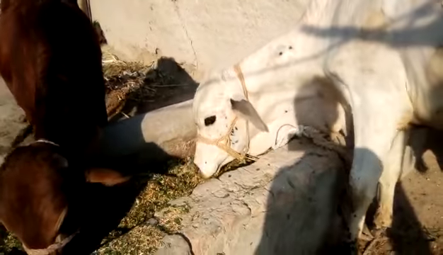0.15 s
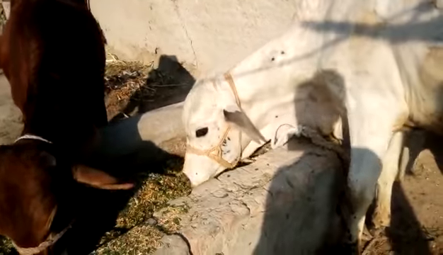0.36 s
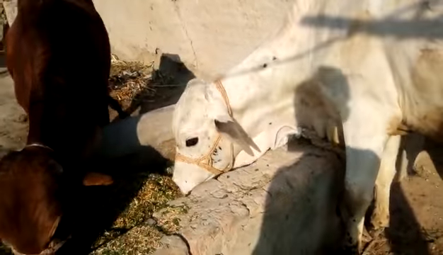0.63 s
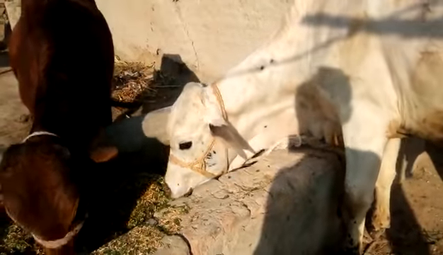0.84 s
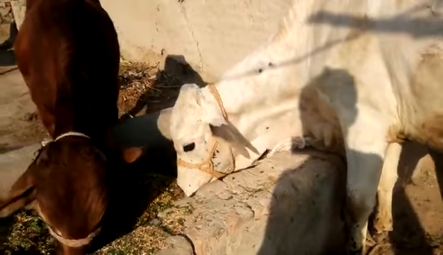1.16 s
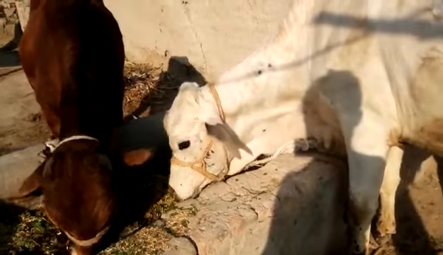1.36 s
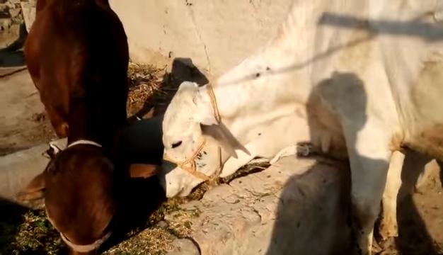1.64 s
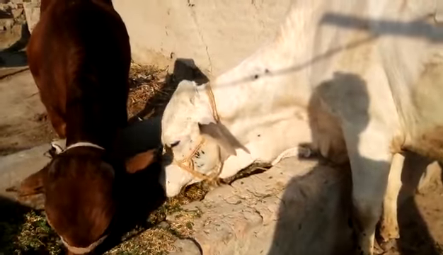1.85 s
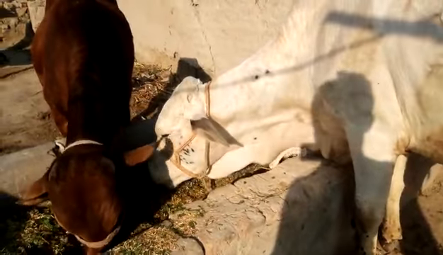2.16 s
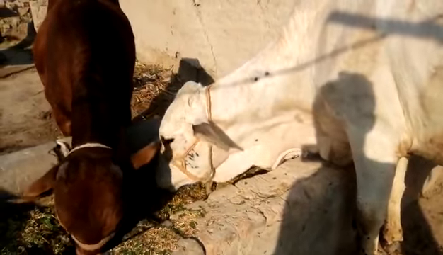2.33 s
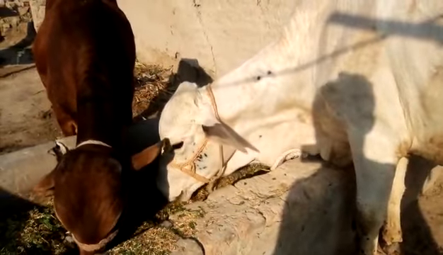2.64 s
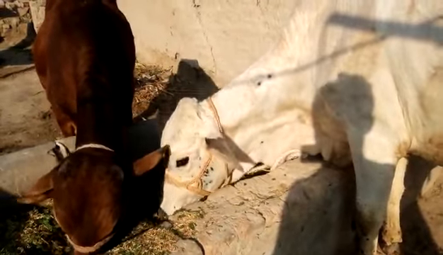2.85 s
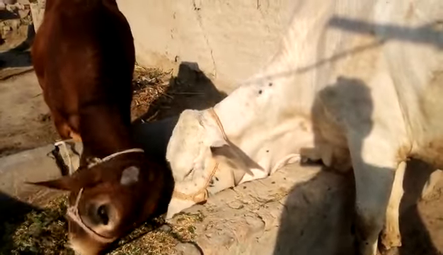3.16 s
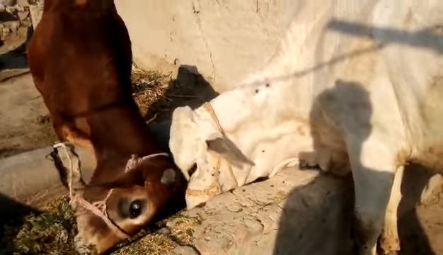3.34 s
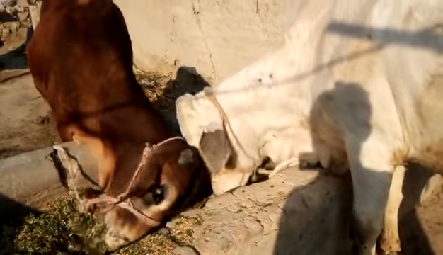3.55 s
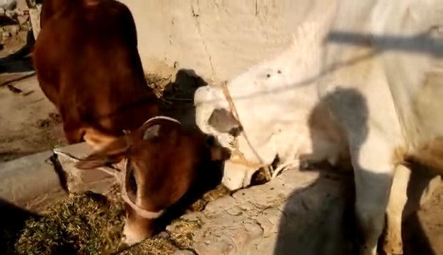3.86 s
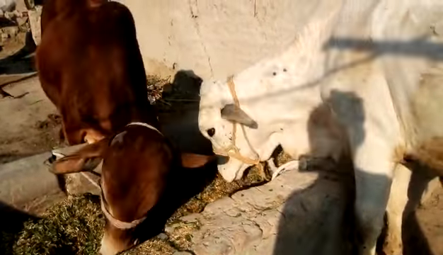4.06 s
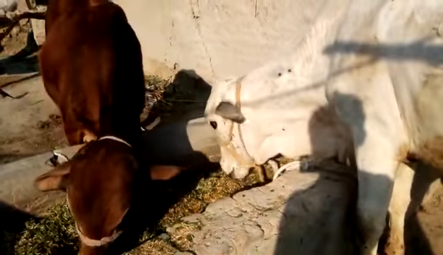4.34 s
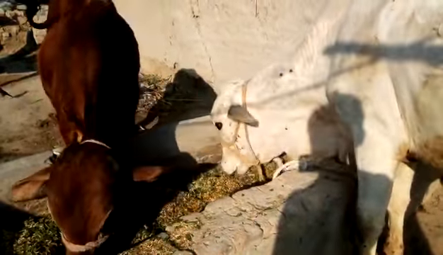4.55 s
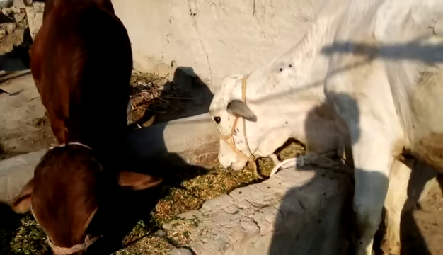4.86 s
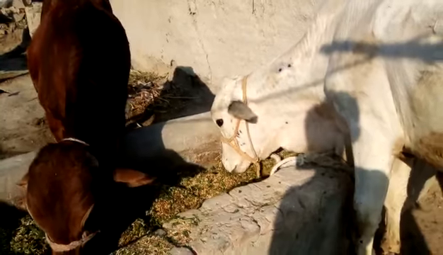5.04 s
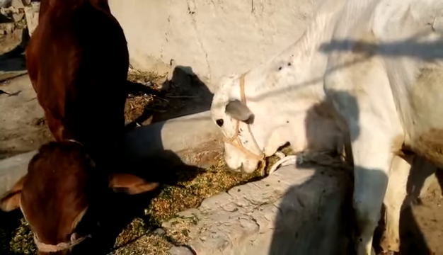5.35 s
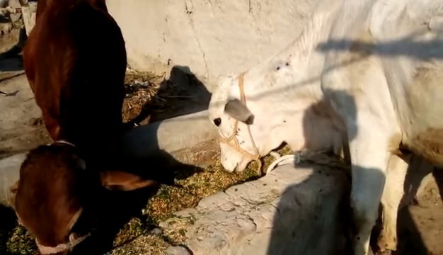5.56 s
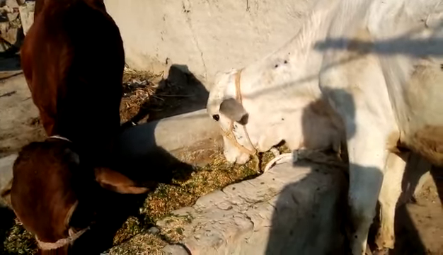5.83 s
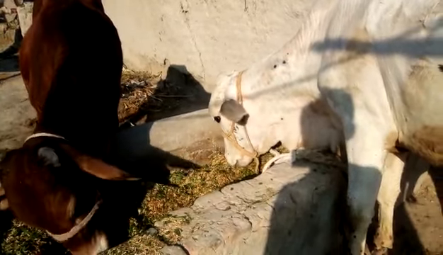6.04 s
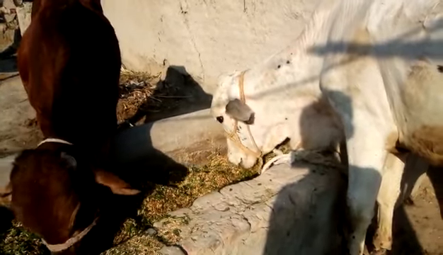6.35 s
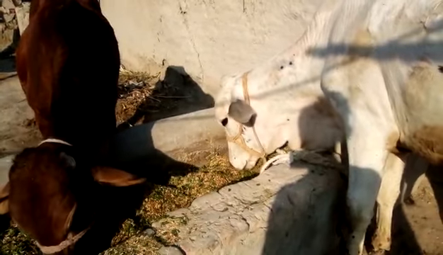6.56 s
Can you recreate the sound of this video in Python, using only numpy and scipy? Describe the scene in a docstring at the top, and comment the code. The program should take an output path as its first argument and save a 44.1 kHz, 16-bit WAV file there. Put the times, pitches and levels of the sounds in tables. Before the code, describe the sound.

Dry fodder crackles and rustles as cattle chew and nose through it in an outdoor yard. Early on come a cluster of snapping stalks and some low thumps, with a faint wavering buzz, perhaps flies, and scattered distant birdsong. The chewing softens, then a nearby bird chirps sharply three times, ringing off the walls. Slight wind bumps the microphone over quiet open air.

```python
"""Cattle chew chopped fodder at a mud trough in a walled yard: chaff rustles and crackles, stalks snap,
muzzles and feet knock. A near bird whistles three rising notes and the walls throw them back; other birds
twitter further off. A low hum, perhaps flies, wavers as narrow bands of noise, and light wind bumps the
microphone over steady far air."""
import sys
import numpy as np
from scipy import signal
from scipy.fft import rfft, irfft
from scipy.io import wavfile
from scipy.ndimage import uniform_filter1d

SR = 44100
rng = np.random.default_rng(int(sys.argv[2]) if len(sys.argv) > 2 else 0)


def store_pcm(level_fs):
    """Save levels as 16-bit WAV."""
    pcm = np.round(np.clip(level_fs, -1, 1) * 32767).astype(np.int16)
    wavfile.write(sys.argv[1], SR, np.atleast_2d(pcm).T)


N = 295470
T = np.arange(N) / SR

# dry chaff spectrum: (frequency [Hz], relative density [dB])
CHAFF_SPECTRUM = [(880, -39), (1500, -22), (1550, -18), (2390, -10.5), (2570, 0), (3410, 0), (4250, 5),
                  (4660, 4.5), (4970, 4.5), (5770, -2.5), (6710, -21), (8720, -34.5), (14800, -120)]


def chewing():
    """Rustle and crackle share the colour of chaff; coarse stalks add a lower body."""
    # bites and pulls: (start [s], length [s], start level [dB], end level [dB], relative stalks [dB])
    bites = [(0, 0.19, -54, -49, -7), (0.298, 0.14, -60, -53.5, -7), (0.75, 0.28, -44.5, -44.5, -12),
             (1.15, 0.075, -57.5, -49, -9), (1.41, 0.1, -52.5, -53, -5), (1.738, 0.083, -57.5, -49, -8),
             (1.891, 0.21, -47.5, -49.5, -8), (2.222, 0.052, -61, -50, -11), (2.445, 0.19, -51, -50, -8),
             (2.69, 0.09, -44, -42, -11.5), (2.934, 0.092, -50.5, -49.5, -9.5),
             (3.162, 0.11, -59.5, -56.5, -8.5), (3.492, 0.095, -67, -58, -34), (3.712, 0.03, -50, -51, -21),
             (3.953, 0.15, -71, -55, -9.5), (4.331, 0.091, -51.5, -58, -21)]
    # steady rummaging: (time [s], level [dB], relative stalks [dB])
    rummage = [(0, -53.5, -11), (.7, -54.5, -11), (1.4, -54, -14.5), (1.65, -58, -8.5), (2.9, -58.5, -7.5),
               (3.45, -68, -5.5), (3.9, -66.5, -19.5), (4.3, -60.5, -14), (4.6, -56.5, -11),
               (5.55, -62, -8.5), (5.75, -53, -26), (5.95, -59, -12.5), (6.09, -53, -21.5),
               (6.7, -70.5, -9.5)]
    # coarse stalks: (frequency [Hz], relative density [dB])
    stalk_spectrum = [(400, -34.5), (1080, -19.5), (1400, -6.5), (1800, 0), (2300, 5.5), (3000, -17.5),
                      (4000, -15)]
    bite_gains = bouts(bites, T, rise_s=0.009, fade_db_per_s=141.5)
    bite_stalk_db = np.transpose(bites)[-1, :, None]
    rummage_db, rummage_stalk_db = curves(rummage, T)
    chaff_gain = power_sum([*bite_gains, amp(rummage_db)])
    stalk_gain = power_sum([*bite_gains * amp(bite_stalk_db), amp(rummage_db + rummage_stalk_db)])
    rustle = patchy(coloured(rng.standard_normal(N), CHAFF_SPECTRUM), depth_db=4.5)
    crunch = patchy(coloured(crackle(per_s=1100, spread_db=6, t60_s=0.027), CHAFF_SPECTRUM), depth_db=4)
    stalks = coloured(crackle(per_s=3200, spread_db=2.5, t60_s=0.031), stalk_spectrum)
    stalks = patchy(stalks, depth_db=4.5)
    crunch_share = 0.26
    chaff = np.sqrt(1 - crunch_share) * rustle + np.sqrt(crunch_share) * crunch
    return chaff_gain * chaff + stalk_gain * stalks


def snaps():
    """Single stalks break: dying bursts, part broad, part ringing."""
    # stalk breaks: (time [s], level [dB], pitch [Hz])
    breaks = [(0.317, -37.5, 4400), (0.319, -43.5, 2130), (0.899, -34, 3460), (0.92, -32.5, 3500),
              (0.942, -35, 4550), (0.95, -32, 4540), (0.9682, -29, 4570), (0.977, -32.5, 4660),
              (0.993, -28.5, 4350), (2.218, -41.5, 2880), (3.237, -46, 4900), (3.7068, -47, 5000),
              (4.3309, -37.5, 3200), (4.35, -35.5, 4000), (4.377, -38.5, 2820), (4.3885, -38, 3460),
              (4.3978, -41.5, 2660), (4.4342, -40, 2800), (6.638, -51, 4400)]
    attack_s, t60_s = 0.0006, 0.016
    out, t = np.zeros(N), T[:3000]
    envelope = amp(-60 * t / t60_s) * np.minimum(t / attack_s, 1)
    for start_s, db, hz in breaks:
        burst = rng.standard_normal(len(t))
        body = band(burst, hz, width_hz=810) + 0.2 * coloured(burst, CHAFF_SPECTRUM)
        add(out, start_s, amp(db) * envelope * body)
    return out


def knocks():
    """Muzzles and feet strike dull blows: a soft-edged ring that dies quickly."""
    # blows: (time [s], level [dB], pitch [Hz], t60 [s])
    blows = [(0.983, -21.5, 103, 0.066), (1.024, -25, 157, 0.046), (1.188, -24.5, 106, 0.037),
             (1.364, -43.5, 325, 0.11), (3.211, -48, 1810, 0.024), (4.203, -43, 140, 0.057),
             (4.701, -59.5, 320, 0.12), (4.919, -62, 324, 0.21), (6.397, -51, 1920, 0.044)]
    attack_cycles = 0.93
    out, t = np.zeros(N), T[:8000]
    for start_s, db, hz, t60_s in blows:
        ring = np.sin(2 * np.pi * hz * t) + 0.27 * band(rng.standard_normal(len(t)), hz, 0.39 * hz)
        add(out, start_s, amp(db - 60 * t / t60_s) * np.minimum(t * hz / attack_cycles, 1) * ring)
    return out


def near_bird():
    """Three whistles leap up, climb and drop, each with a brief level dip, framed by hoarse flicks."""
    # whistles: (start [s], length [s], top pitch [Hz], climb time [s], level [dB], dip delay [s],
    # dip depth [dB], cut before dip [dB], lead flick base level [dB], lead flick start [Hz])
    calls = [(4.682, 0.083, 3255, .017, -24.5, .035, 8, 6.5, -43, 3140),
             (4.935, 0.078, 3200, 0.018, -25, 0.019, 17, 5, -43, 2020),
             (5.191, .088, 3200, .024, -24, .047, 8, 3.5, -41, 2170)]
    # whistle overtones: (pitch multiple, relative level [dB])
    overtones = [(2, -20), (3, -19)]
    # breathy sweeps an octave above a whistle's leap, and at its drop: (length [s], level [dB], start [Hz],
    # middle [Hz], end [Hz])
    edge_rasps = [(0.014, -47, 3900, 4700, 5440), (0.014, -46, 5720, 4600, 4400)]
    # trough and wall reflections: (delay [s], gain [dB])
    echoes = [(.004, -3.5), (0.015, -9), (.047, -8), (.058, -11.5)]
    low_hz, climb_hz = 1990, 492
    leap_s, drop_s, dip_width_s = 0.01, 0.01, 0.0042
    swell_db, leap_db, drop_db = 5.5, 27.5, 30
    lead_ahead_s, lead_length_s, lead_middle_hz, lead_end_hz = 0.041, 0.022, 3750, 2400
    out, u = np.zeros(N), np.linspace(0, 1, num=17)
    for start_s, length_s, top_hz, climb_s, db, dip_s, dip_db, cut_db, lead_db, lead_start_hz in calls:
        t = np.linspace(0, length_s, num=90)
        leap, hold = np.minimum(t / leap_s, 1), np.minimum((length_s - t) / drop_s, 1)
        rising_hz = top_hz - climb_hz * np.exp(-np.maximum(t - leap_s, 0) / climb_s)
        hz = low_hz + leap * hold * (rising_hz - low_hz)
        shape_db = -swell_db * (1 - t / length_s) - leap_db * (1 - leap) ** 1.2
        shape_db -= drop_db * (1 - hold) ** 1.4
        shape_db -= dip_db * np.exp(-((t - dip_s) / dip_width_s) ** 2) + cut_db * (t < dip_s)
        contour = np.c_[start_s + t, hz, db + shape_db]
        add(out, *whistle(contour, flutter_db=1.4, hoarse_s=0.0018, overtones=overtones))
        lead_s, lead_hz = start_s - lead_ahead_s, (lead_start_hz, lead_middle_hz, lead_end_hz)
        lead = np.c_[lead_s + lead_length_s * u, glide(lead_hz, u), np.full_like(u, lead_db - 4)]
        add(out, *whistle(lead, flutter_db=3, hoarse_s=0.005))
        add(out, lead_s, rasp(lead_length_s, lead_db - 4.5, *lead_hz))
        add(out, start_s, rasp(*edge_rasps[0]))
        add(out, start_s + length_s - drop_s, rasp(*edge_rasps[1]))
    highpass = signal.butter(4, 1700, "high", fs=SR, output="sos")  # a small throat gives no bass
    return reverb(signal.sosfilt(highpass, out), tail_db=-6.5, t60_s=0.42, echoes=echoes)


def whistle(contour, flutter_db, hoarse_s=0, waver_hz=0, overtones=()):
    """Start time and tone along (time [s], pitch [Hz], level [dB]); fast glides turn hoarse."""
    t = np.arange(contour[0][0], contour[-1][0], 1 / SR)
    hz, db = curves(contour, t)
    slope_hz_per_s = np.minimum(abs(np.gradient(hz)) * SR, 60000)
    hz = hz + (waver_hz + hoarse_s * slope_hz_per_s) * drift(0.0012, len(t))
    phase = 2 * np.pi * np.cumsum(hz) / SR
    tone = np.sin(phase) + sum(amp(level_db) * np.sin(k * phase) for k, level_db in overtones)
    fade = np.minimum(np.minimum(t - t[0], t[-1] - t) / 0.002, 1)
    return t[0], np.sqrt(2) * tone * fade * amp(db + flutter_db * drift(0.007, len(t)))


def rasp(length_s, db, *hz):
    """Breathy noise through a gliding resonance."""
    u = np.arange(0, 1, 1 / (length_s * SR))
    return amp(db) * band(rng.standard_normal(len(u)), glide(hz, u), width_hz=1800) * np.sin(np.pi * u)


def far_birds():
    """Gliding notes and one rolled call, blurred by distance."""
    # far notes: (time [s], length [s], start [Hz], middle [Hz], end [Hz], level [dB])
    notes = [(.315, 0.024, 4750, 4440, 4240, -42.5), (0.317, 0.04, 3650, 3270, 3100, -52),
             (0.36, .05, 4150, 4110, 4050, -48), (0.417, 0.018, 2300, 3000, 4100, -51),
             (0.434, 0.011, 4000, 3400, 2800, -52), (0.443, 0.028, 2690, 2600, 2340, -44.5),
             (0.461, .023, 5000, 4520, 4350, -45), (1.228, 0.043, 5370, 4700, 4740, -51),
             (1.512, 0.14, 4400, 4460, 4450, -52), (1.524, 0.046, 2400, 2090, 2020, -52),
             (1.756, 0.038, 2740, 2540, 2390, -51.5), (1.792, 0.023, 4400, 3300, 2620, -49),
             (1.817, 0.018, 5650, 5300, 4300, -44), (1.814, .014, 3350, 3550, 3620, -45),
             (1.826, .009, 3600, 2850, 2250, -44), (2.237, 0.029, 2310, 3100, 3540, -57),
             (2.255, 0.034, 3440, 3430, 3580, -51), (2.257, 0.029, 4550, 4590, 4600, -51),
             (2.414, 0.014, 4900, 5250, 5300, -48), (2.426, 0.028, 5250, 4500, 4000, -50),
             (2.44, .027, 2785, 2734, 2660, -54), (2.482, 0.032, 4580, 4310, 4040, -47.5),
             (2.486, 0.025, 3470, 3240, 3210, -52), (2.554, 0.036, 5000, 5750, 5100, -47.5),
             (2.664, 0.026, 4850, 5050, 5380, -43), (2.686, .022, 5380, 4700, 3900, -44),
             (2.858, 0.155, 4350, 4338, 4330, -42), (3.001, .04, 5900, 5000, 4300, -53),
             (3.008, 0.028, 3600, 2800, 2200, -51), (3.472, 0.028, 3770, 3800, 3760, -61),
             (3.498, 0.034, 3760, 3300, 3000, -63), (3.53, 0.095, 3000, 2950, 2700, -62),
             (3.63, 0.1, 2330, 2290, 2550, -68), (3.703, .016, 4600, 4850, 5200, -49),
             (3.722, .024, 4550, 4800, 5050, -49), (3.832, .048, 5800, 5750, 4400, -63),
             (3.878, 0.055, 4300, 3350, 3050, -65), (3.974, 0.068, 3290, 3345, 3380, -52),
             (4.048, 0.018, 2350, 3000, 3400, -54), (4.064, 0.053, 3370, 3700, 3720, -48.5),
             (4.616, .14, 1256, 1375, 1500, -58), (5.121, 0.025, 5280, 4860, 5920, -49),
             (5.38, 0.15, 674, 682, 690, -71.5), (5.755, 0.03, 2400, 2050, 1930, -55),
             (5.865, .1, 1270, 1340, 1400, -76), (0.2, .35, 695, 690, 685, -72),
             (2.36, .32, 680, 695, 690, -72), (6.664, .04, 1520, 1620, 1740, -72),
             (6.036, 0.018, 2520, 2440, 2400, -58.5), (6.092, 0.012, 2820, 2520, 2300, -58),
             (6.097, 0.073, 720, 699, 674, -73.5), (6.152, .1, 966, 1025, 1027, -74.5),
             (6.367, 0.051, 1000, 948, 1003, -67.5)]
    # rolled call: (time [s], level [dB], pulse rate [1/s])
    trill = [(2.567, -52, 107), (2.6, -58, 109), (2.64, -45.5, 109), (2.69, -52.5, 109), (2.762, -43, 105)]
    # its resonances: (frequency [Hz], width [Hz], relative level [dB])
    trill_modes = [(2170, 380, -7), (3250, 420, 9.5)]
    out, u = np.zeros(N), np.linspace(0, 1, num=17)
    for start_s, length_s, *hz, db in notes:
        swell_db = db - 8 * (1 - u) ** 8 - 6 * u ** 6
        contour = np.c_[start_s + length_s * u, glide(hz, u), swell_db]
        add(out, *whistle(contour, flutter_db=3.5, hoarse_s=0.001, waver_hz=30))
    t = np.arange(trill[0][0], trill[-1][0], 1 / SR)
    trill_db, pulses_per_s = curves(trill, t)
    pulses = np.diff(np.floor(np.cumsum(pulses_per_s) / SR), prepend=0)
    rolled = sum(amp(db) * band(pulses, hz, width_hz) for hz, width_hz, db in trill_modes)
    add(out, t[0], amp(trill_db) * unit_rms(rolled))
    return reverb(out, tail_db=-10, t60_s=0.3)


def hum():
    """Perhaps flies: a fuzzy wavering line over a rough body, with overtones that come and go."""
    # hum bouts: (start [s], length [s], start level [dB], end level [dB],
    # relative body level [dB], relative overtone level [dB])
    spells = [(0, 0.23, -57, -53.5, -12, -8.5), (0.435, 0.44, -67, -58.5, -9.5, -7),
              (0.927, 0.11, -63, -50.5, -1, -8.5), (1.208, 0.31, -57.5, -55, -10.5, -10),
              (1.785, 0.11, -69.5, -58.5, -16, -11), (1.956, 0.21, -55.5, -61.5, -9, -4.5),
              (2.267, 0.3, -62.5, -68, -5.5, -13.5), (2.659, 0.094, -62, -55.5, -3, -4.5),
              (2.795, 0.26, -49.5, -53, -8.5, -18), (3.131, 0.073, -64, -67, -3, -26)]
    # hum pitch: (time [s], pitch [Hz])
    pitch = [(0, 218.5), (2.6, 219.8), (3, 198.7), (3.4, 203)]
    # overtone bands: (pitch multiple, relative level [dB])
    partials = [(2, -9), (3.001, -1.5), (3.997, 4.5), (5.4, 1), (6.5, -5.5)]
    t = T[T < pitch[-1][0]]
    gains = bouts(spells, t, rise_s=0.046, fade_db_per_s=249.5)
    hz = curves(pitch, t)[0] * (1 + 0.024 * drift(0.056, len(t)))
    noise = rng.standard_normal(len(t))
    overtones = sum(amp(db + 3.2 * drift(0.14, len(t))) * band(noise, k * hz, width_hz=22 * k)
                    for k, db in partials)
    body_db, overtone_db = np.transpose(spells)[-2:, :, None]
    line = power_sum(gains) * band(noise, hz, width_hz=48)
    body = power_sum(gains * amp(body_db)) * band(noise, 0.83 * hz, width_hz=220)
    out = np.zeros(N)
    add(out, 0, line + body + power_sum(gains * amp(overtone_db)) * unit_rms(overtones))
    return out


def wind():
    """Lumpy low pressure on the microphone."""
    # gusts: (start [s], length [s], start level [dB], end level [dB])
    gusts = [(.15, 0.11, -80, -59), (.82, 0.23, -62.5, -48), (1.17, 0.074, -63, -59.5),
             (1.5, 0.073, -87, -72), (1.9, 0.29, -74, -72), (2.75, 0.24, -73.5, -56),
             (3.3, 0.067, -84, -74), (4.08, 0.2, -70.5, -66.5), (4.5, 0.021, -74, -68),
             (5.52, 0.16, -66, -69), (6.12, 0.087, -74, -74)]
    # wind rumble: (frequency [Hz], relative density [dB])
    spectrum = [(12, -64.5), (20, -7), (76, 9), (108, -1), (220, -12.5), (334, -25.5), (500, -35),
                (650, -66.5), (1100, -120)]
    lull_db = -80
    gain = amp(lull_db) + power_sum(bouts(gusts, T, rise_s=0.044, fade_db_per_s=151.5))
    return gain * amp(2.7 * drift(0.023)) * coloured(rng.standard_normal(N), spectrum)


def far_air():
    """Steady faint noise of the open air."""
    # far air: (frequency [Hz], relative density [dB])
    spectrum = [(15, -49.5), (25, -9), (81, -11.5), (266, -11.5), (377, -12.5), (876, -17), (1770, -27),
                (2510, -7), (2760, -37.5), (3100, -8.5), (4510, 2.5), (5440, -8.5), (6710, -49),
                (8720, -81.5), (14800, -120)]
    return amp(-61.5) * patchy(coloured(rng.standard_normal(N), spectrum), depth_db=4)


def reverb(x, tail_db, t60_s, echoes=()):
    """Direct sound, single echoes from hard walls and a dense dying tail."""
    t = T[:SR]
    tail = amp(-60 * t / t60_s) * rng.standard_normal(SR) * np.minimum(t / 0.019, 1)
    response = amp(tail_db) * tail / np.linalg.norm(tail)
    response[0] = 1
    for delay_s, db in echoes:
        response[round(delay_s * SR)] += amp(db)
    return signal.oaconvolve(x, response)[:N]


def crackle(per_s, spread_db, t60_s):
    """Many small breaks of uneven size, each a short noise burst."""
    sizes = amp(spread_db * np.minimum(rng.exponential(1, N), 5)) * (rng.random(N) < per_s / SR)
    bursts = signal.oaconvolve(sizes, amp(-60 * T[:1500] / t60_s))[:N]
    return unit_rms(bursts * rng.standard_normal(N))


def patchy(x, depth_db):
    """Narrow bands swell and fade at random; rms 1."""
    spectra = signal.stft(x, nperseg=512)[2]
    patches = uniform_filter1d(rng.standard_normal(spectra.shape), size=2, axis=0)
    patches = unit_rms(uniform_filter1d(patches, size=18, axis=1))
    gains = amp(depth_db * np.minimum(patches, 1.3))
    return unit_rms(signal.istft(spectra * gains, nperseg=512)[1][:len(x)])


def coloured(x, spectrum):
    """Filter by (frequency [Hz], gain [dB]) points; rms 1."""
    hz, db = np.transpose(spectrum)
    bin_hz = np.fft.rfftfreq(len(x), 1 / SR)
    gains = amp(np.interp(np.log(bin_hz + 1), np.log(hz + 1), db))
    return unit_rms(irfft(rfft(x) * gains, len(x)))


def resonate(x, hz, width_hz):
    """Resonance: shift hz down to zero, smooth, shift back."""
    carrier = np.exp(2j * np.pi * np.cumsum(hz * np.ones(len(x))) / SR)
    pole = np.exp(-np.pi * abs(width_hz) / SR)
    return 2 * (carrier * signal.lfilter([1 - pole], [1, -pole], x / carrier)).real


def band(x, hz, width_hz):
    """A resonance applied twice; rms 1."""
    return unit_rms(resonate(resonate(x, hz, width_hz), hz, width_hz))


def bouts(rows, t, rise_s, fade_db_per_s):
    """One gain curve a row: rise, glide from start level to end level, fade."""
    start_s, length_s, from_db, to_db = np.transpose(rows)[:4, :, None]
    held_db = from_db + (to_db - from_db) * np.clip((t - start_s) / length_s, 0, 1)
    fade_db = fade_db_per_s * np.maximum(t - start_s - length_s, 0)
    return np.clip((t - start_s) / rise_s + 1, 0, 1) * amp(held_db - fade_db)


def drift(span_s, count=N):
    """Smoothed noise; rms 1."""
    span = max(int(span_s * SR), 1)
    return unit_rms(uniform_filter1d(uniform_filter1d(rng.standard_normal(count), span), span))


def glide(hz, u):
    """Parabola through start, middle and end pitch, for u from 0 to 1."""
    return np.polyval(np.polyfit([0, 0.5, 1], hz, deg=2), u)


def curves(rows, t):
    times_s, *columns = np.transpose(rows)
    return [np.interp(t, times_s, column) for column in columns]


def add(mix, start_s, sound):
    part = mix[round(start_s * SR):][:len(sound)]
    part += sound[:len(part)]


def power_sum(gains):
    return np.sqrt(np.sum(np.square(gains), axis=0))


def unit_rms(x):
    return x / np.sqrt(np.mean(x ** 2) + 1e-20)


def amp(db):
    return 10 ** (np.asarray(db) / 20)


def scene():
    """Feeding cattle, birds and background in mono."""
    cattle = reverb(snaps(), tail_db=0, t60_s=0.035) + chewing() + knocks()
    return (cattle + near_bird() + far_birds() + hum() + wind() + far_air())[None]


def record(dry):
    """Treble rolls off but for a faint narrow band near 9.5 kHz; faint even hiss; none above 15.7 kHz."""
    roll_off_hz, high_band_hz, edge_hz = 7050, 9530, 15700
    high_band_db, hiss_db = -25, -89.5
    roll_off = signal.firwin(127, roll_off_hz, window=("kaiser", 8), fs=SR)
    band_limit = signal.firwin(511, edge_hz, window=("kaiser", 9), fs=SR)
    low = signal.oaconvolve(dry, roll_off[None], "same")
    treble = dry[0] - low[0]
    high_band = resonate(resonate(treble, high_band_hz, width_hz=700), high_band_hz, width_hz=700)
    heard = low + amp(high_band_db) * high_band + amp(hiss_db) * rng.standard_normal(dry.shape)
    return signal.oaconvolve(heard, band_limit[None], "same")


dry = scene()
out = record(dry)
store_pcm(out)
```